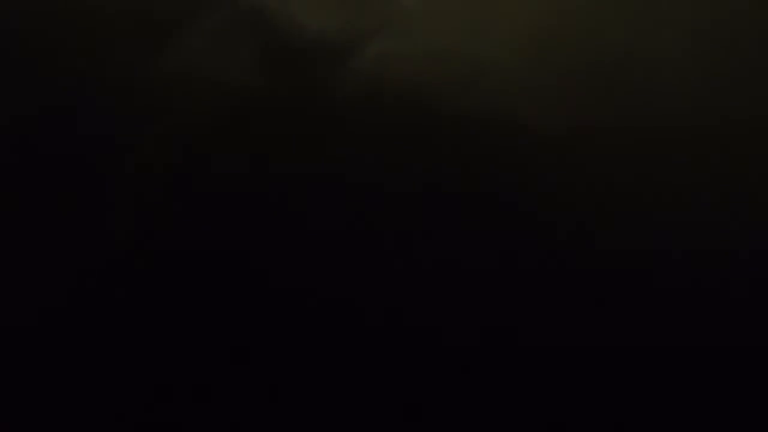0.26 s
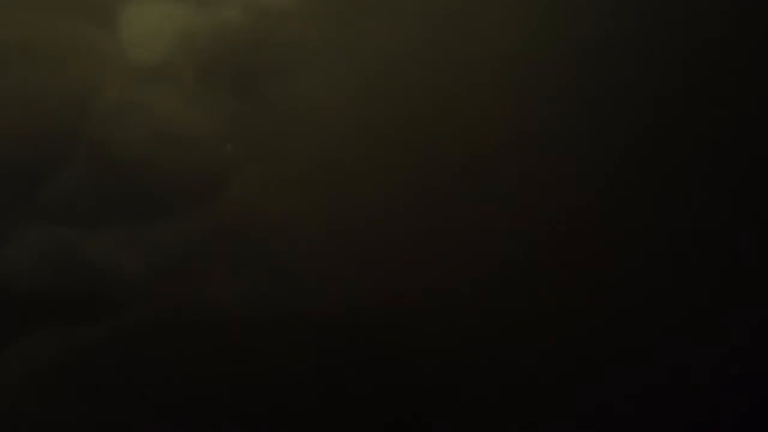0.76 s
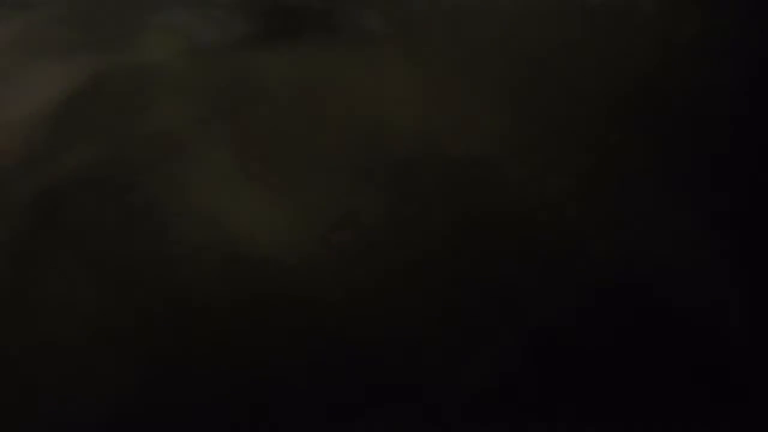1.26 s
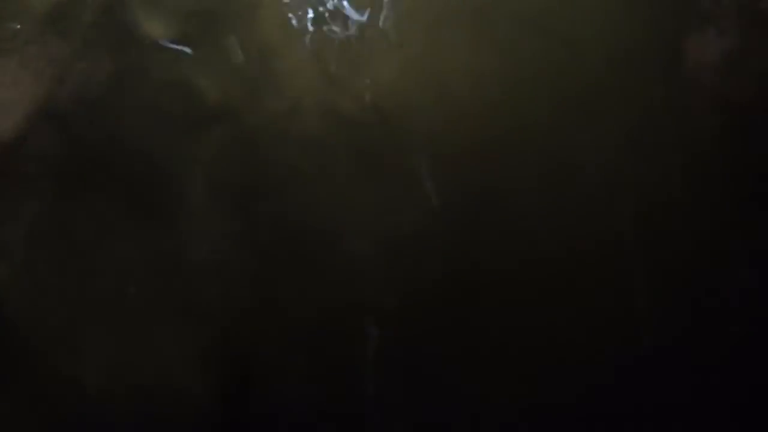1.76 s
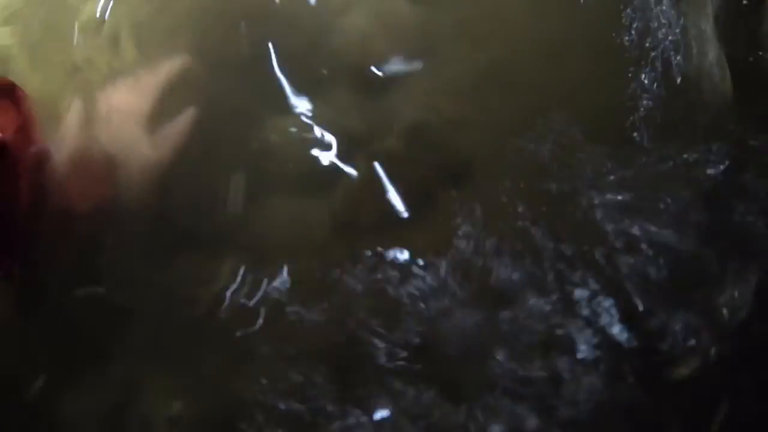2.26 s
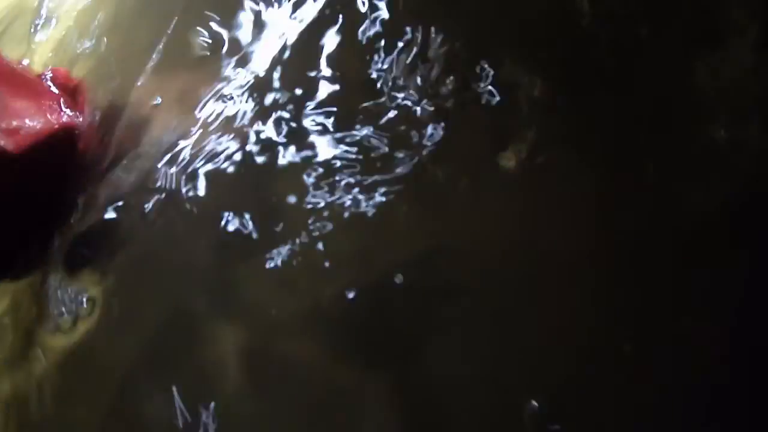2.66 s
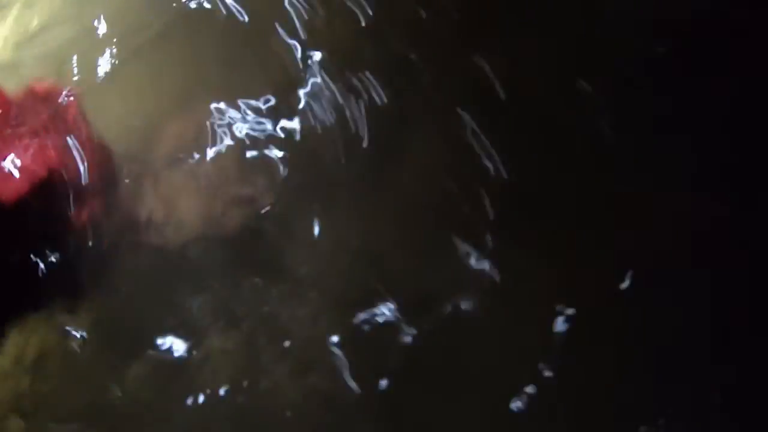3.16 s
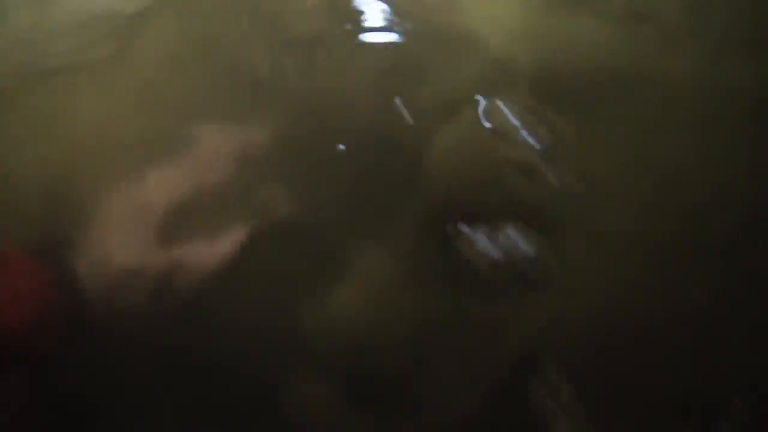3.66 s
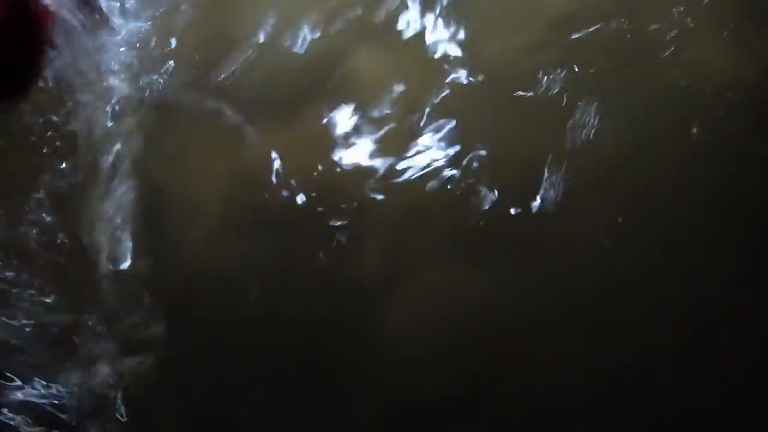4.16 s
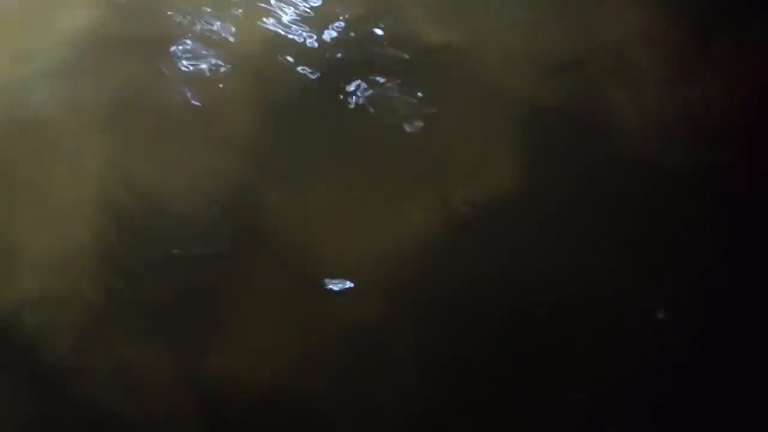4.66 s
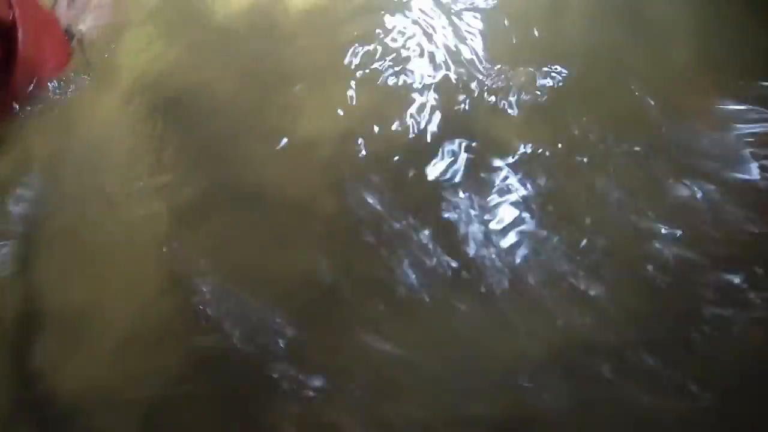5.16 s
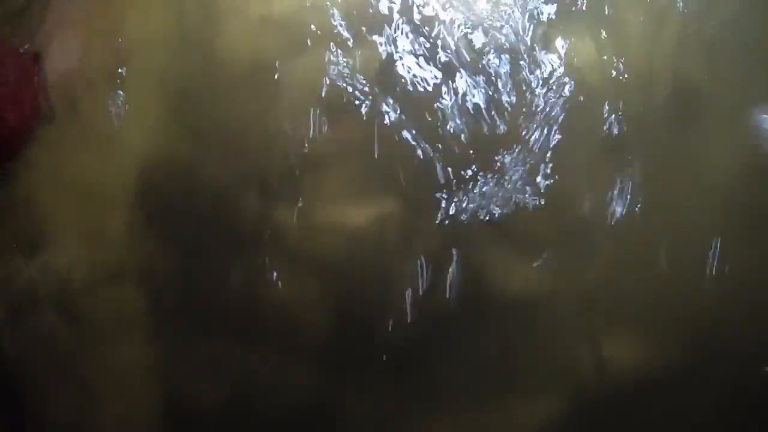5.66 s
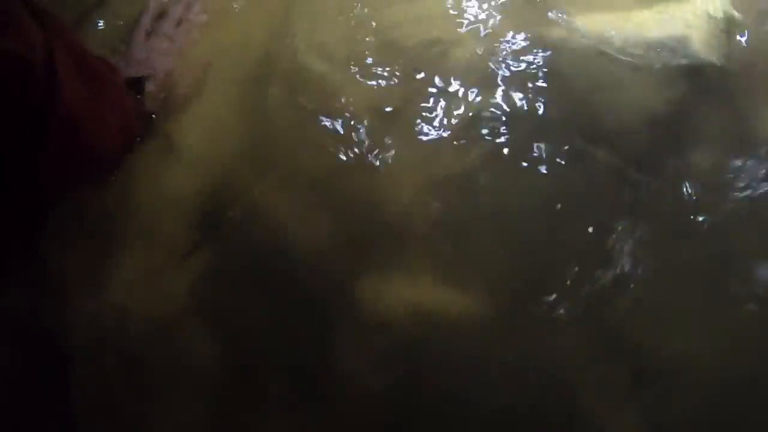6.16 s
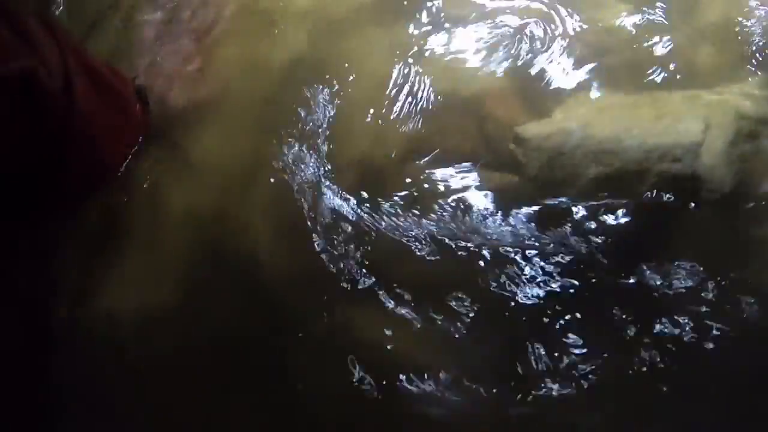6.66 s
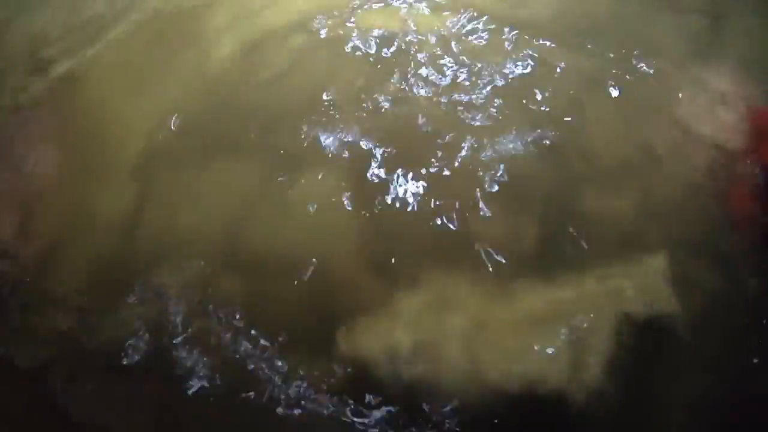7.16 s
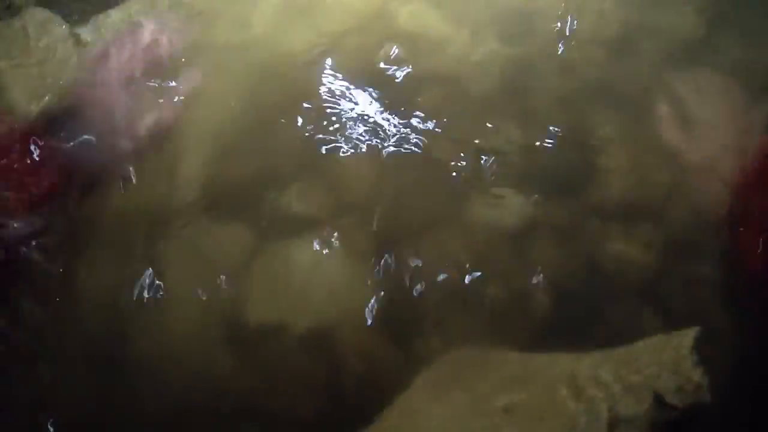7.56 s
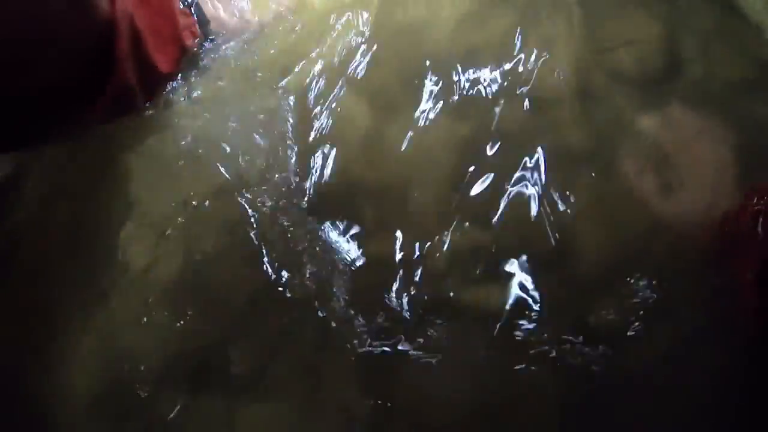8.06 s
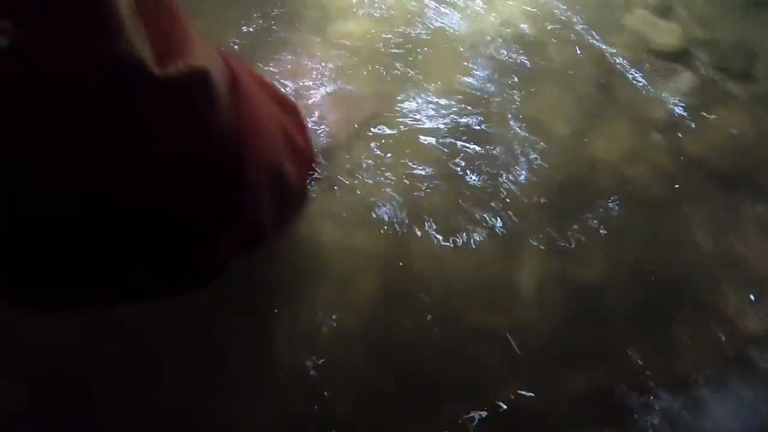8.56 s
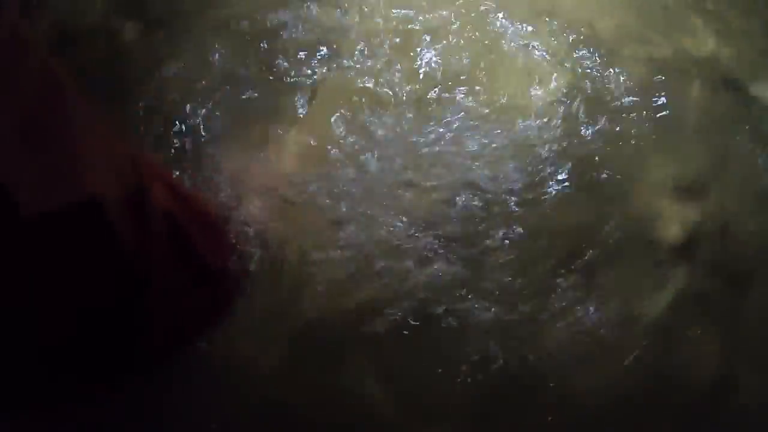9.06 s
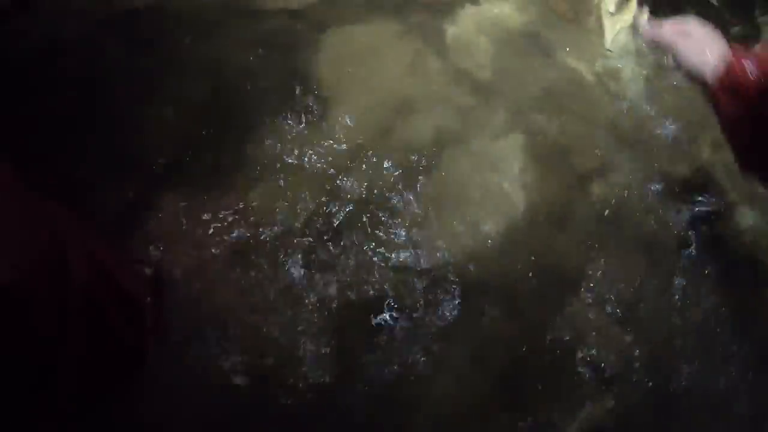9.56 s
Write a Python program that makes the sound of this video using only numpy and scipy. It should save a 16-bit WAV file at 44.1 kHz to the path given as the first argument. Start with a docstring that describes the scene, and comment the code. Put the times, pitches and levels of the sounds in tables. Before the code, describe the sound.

A loud, low underwater rumble cuts off, then shallow cave water sloshes and gurgles close by with soft, irregular wading splashes.

```python
"""A low rumble of water rolls off a sealed camera housing as it lifts out of a shallow cave stream.
Then the pool sloshes and gurgles close by as someone wades. Turbulence gives the noise, air bubbles
ring as damped oscillators, droplets tick on the shell, and near rock walls return a short echo.
The housing muffles all but the bass and one thin treble band."""
import sys
import numpy as np
from scipy import signal
from scipy.fft import rfft, irfft, next_fast_len
from scipy.io import wavfile
from scipy.ndimage import uniform_filter1d, minimum_filter1d, map_coordinates

SR = 44100
rng = np.random.default_rng(int(sys.argv[2]) if len(sys.argv) > 2 else 0)


def unload_wav(signal):
    """Save mono or channel-first audio to the path in sys.argv[1] as 16-bit WAV at rate SR, clipped to [-1, 1]."""
    wavfile.write(
        sys.argv[1],
        SR,
        np.round(np.clip(np.atleast_2d(signal).T, -1, 1) * 32767).astype(np.int16),
    )


N = 432621


def amp(db):
    return 10 ** (np.asarray(db) / 20)


def unit_rms(x):
    return x / np.sqrt(np.mean(x ** 2) + 1e-20)


def along(points, hz):
    """Interpolation of (frequency, value) points on a logarithmic frequency axis."""
    f, v = np.transpose(points)
    return np.interp(np.log(hz + 1), np.log(f + 1), v)


def curves(rows):
    """Linear interpolation in time: one value per sample for each column after the first."""
    times, *columns = np.transpose(rows)
    return [np.interp(np.arange(N) / SR, times, column) for column in columns]


def wobble(rate):
    """Random modulation: a spline through `rate` Gaussian values a second."""
    return map_coordinates(rng.standard_normal(N // 100), [np.arange(N) * rate / SR])


def filtered(x, response):
    """Zero-phase filtering: the spectrum is multiplied by a frequency response."""
    size = next_fast_len(N + 8192)
    return irfft(rfft(x, size) * response(np.fft.rfftfreq(size, 1 / SR)), size)[:N]


def coloured(x, spectrum):
    """Spectral shaping: x is whitened, given the spectrum and scaled to unit rms."""
    skirted = [(spectrum[0][0] / 4, -120), *spectrum, (spectrum[-1][0] * 3, -140)]
    own_colour = lambda hz: uniform_filter1d(np.abs(rfft(x, 2 * len(hz) - 2)), size=2001) + 1e-9
    return unit_rms(filtered(x, lambda hz: amp(along(skirted, hz)) / own_colour(hz)))


def noise(spectrum):
    return coloured(rng.standard_normal(N), spectrum)


def lay(start, shapes):
    """Superposition: each row of samples is added at its start time in seconds."""
    at = np.round(start * SR).astype(int)[:, None] + np.arange(shapes.shape[1])
    return np.bincount(at.clip(-1, N).ravel() + 1, shapes.ravel(), N + 2)[1:N + 1]


def humps(tops, db, rise, fall):
    """Upper envelope of triangular rises and falls in dB, zero between events."""
    lift, t = np.zeros(N), np.arange(N) / SR
    for top, height, up, down in np.broadcast(tops, db, rise, fall):
        lift = np.maximum(lift, np.interp(t, [top - up, top, top + down], [0, height, 0]))
    return lift


# Flow round the submerged shell. Each row: time in seconds, rumble in dB, gurgle in dB.
UNDERWATER = [(0, -21.5, -18.5), (.18, -19.5, -29), (.25, -18.5, -22), (.43, -24.5, -38), (.6, -30, -30),
              (.66, -30.5, -36.5), (.84, -27.5, -30.5), (.94, -32, -39), (1.09, -63, -43.5)]
# Slow waves that nudge the shell. Each row: crest time in seconds, lift in dB.
SLOW_WAVES = [(1.799, 12.5), (2.06, 6), (2.45, 10.5), (3.72, 5.5), (4.75, 5), (5.02, 10), (5.3, 7.5),
              (5.6, 11.5), (6.33, 5), (6.83, 1.5), (7.08, 9.5), (7.5, 10.5), (7.86, 7), (8.3, 4),
              (8.54, 13.5), (8.83, 14), (9, 7.5), (9.6, 8), (9.81, 7)]
# Deep pushes of water. Each row: crest time in seconds, gurgle and churn lifts in dB,
# rise and fall in seconds.
DEEP_PUSHES = [(1.94, 18.7, 2, 0.39, 0.59), (2.47, 14.5, 3.3, 0.94, 0.88), (3.7, 11, 2.1, 0.47, 0.16),
               (4.2, 19.5, 8.6, 0.25, 0.43), (5.01, 9.6, 2.1, 0.7, 0.88), (5.85, 9.2, 0.58, 0.1, 0.4),
               (7.1, 7.1, 2.9, 0.068, 0.59), (7.77, 12.7, 4.9, 0.58, 0.66), (8.56, 10.7, 8.1, 0.23, 0.52),
               (8.85, 17.6, 3.3, 0.31, 0.11), (9.79, 1.1, 6.7, 0.31, 0.09)]
# The pool between splashes. Each row: time in seconds, then slosh, spatter and fizz in dB.
CALM_POOL = [(0, -40.5, -79.5, -71), (.22, -67.5, -75.5, -77), (.33, -48.5, -78, -71),
             (.4, -57.5, -76.5, -72.5), (.5, -44, -69, -65.5), (.66, -51.5, -68, -77.5),
             (.72, -52, -76, -66.5), (.82, -47.5, -61.5, -73), (.9, -54.5, -79, -67.5),
             (.95, -45.5, -66, -71), (1.15, -49, -83, -77.5), (1.55, -40, -73, -77),
             (2.1, -40.5, -73.5, -75), (2.6, -39.5, -70.5, -71.5), (3.2, -41.5, -71.5, -78),
             (3.8, -41, -70, -76.5), (4.8, -42.5, -75, -77), (5.5, -44, -73, -75.5),
             (6.3, -41.5, -72, -81.5), (6.75, -45.5, -69, -83), (7.15, -45, -67.5, -77),
             (8.4, -41.5, -65, -73), (9.1, -41.5, -69.5, -74.5), (9.81, -44.5, -66.5, -71.5)]
# Splashes. Each row: crest time in seconds, lift in dB, rise and fall in seconds.
WADING_SPLASHES = [(1.921, 6, 0.078, 0.16), (4.28, 11, 0.31, 0.81), (5.01, 7, 0.31, 0.9),
                   (5.88, 11.5, 0.33, 0.19), (6.93, 3, 0.19, .08), (7.12, 4, 0.12, .1),
                   (7.72, 4.5, 0.12, 0.2), (8.2, 5.5, 0.17, 0.22), (8.8, 8, 0.43, 0.28)]
CALM_GURGLE_DB, CALM_CHURN_DB, CALM_HEAVE_DB = -48, -44, -40


def water_levels():
    """Amplitude envelopes in dB: waves, pushes and splashes lift six bands above calm water."""
    rumble_db, bubbling_db = curves(UNDERWATER)
    # the slow heave overtakes the rumble as the shell nears the surface
    nearing_db = -12 + 17 * np.arange(N).clip(0, SR) / SR
    wave_db = humps(*np.transpose(SLOW_WAVES), rise=0.33, fall=0.19)
    heave_db = np.maximum(rumble_db + nearing_db, CALM_HEAVE_DB + wave_db)
    tops, gurgle_lift, churn_lift, rise, fall = np.transpose(DEEP_PUSHES)
    churn_db = np.maximum(rumble_db, CALM_CHURN_DB + humps(tops, churn_lift, rise, fall))
    gurgle_db = np.maximum(bubbling_db, CALM_GURGLE_DB + humps(tops, gurgle_lift, rise, fall))
    slosh_db, spatter_db, fizz_db = curves(CALM_POOL)
    splash_db = humps(*np.transpose(WADING_SPLASHES))
    return (heave_db, churn_db, gurgle_db,
            slosh_db + splash_db, spatter_db + splash_db, fizz_db + 0.98 * splash_db)


def swarm(count, hz, octaves, cycles, spread_db, samples):
    """Bubble resonance: damped sines of random onset and size, each rising in pitch."""
    start = rng.random(count) * N / SR
    pitch = hz * 2 ** (octaves * rng.standard_normal((count, 1)))
    strength = amp(spread_db * rng.exponential(size=(count, 1)))
    turns = pitch * np.arange(samples) / SR
    age = turns / cycles
    envelope = strength * age * np.exp(-2.5 * age) * np.hanning(2 * samples)[samples:]
    return lay(start, envelope * np.sin(2 * np.pi * turns * (1 + 0.065 * age)))


def bubbly_flow(spectrum, grains, bubble_share, flutter_db):
    """Incoherent sources add in power: reverberant bubbles and turbulence share one spectrum."""
    turbulence = noise(spectrum)
    bubbling = coloured(grains + amp(-5.5) * cave_echo(grains), spectrum)
    flow = np.sqrt(bubble_share) * bubbling + np.sqrt(1 - bubble_share) * turbulence
    return unit_rms(amp(flutter_db) * flow)


# Spectra of the water, low to high. Each row: frequency in Hz, relative spectral density in dB.
HEAVE_SPECTRUM = [(7, -16.5), (15, 6.5), (30, -2.5), (45, -1), (65, -19), (120, -60.5)]
CHURN_SPECTRUM = [(35, -1.5), (65, 0), (130, -0.5), (220, -2.5), (300, -26.5), (450, -56)]
GURGLE_SPECTRUM = [(170, -56.5), (250, -2), (320, 0), (430, -3), (560, -23), (900, -64)]
SLOSH_SPECTRUM = [(300, -25.5), (450, -1.5), (670, -1.5), (830, -8.5), (1300, -21.5), (1900, -42),
                  (3000, -79.5)]
SPATTER_SPECTRUM = [(900, -35.5), (1400, -7), (2100, -14.5), (3000, -24.5), (4000, -40.5)]
FIZZ_SPECTRUM = [(2500, -19.5), (3400, -6.5), (4200, 3), (5000, 7.5), (5700, 2.5), (6500, -6),
                 (6900, -13.5), (10000, -47.5), (15000, -65)]
SPRAY_SPECTRUM = [(6300, -25), (7200, 5), (9500, 1), (11500, -7), (14000, -27)]


def stream():
    """Turbulent pressure heaves and churns on the shell; the smaller a bubble, the higher it rings."""
    heave_db, churn_db, gurgle_db, slosh_db, spatter_db, fizz_db = water_levels()
    lap = wobble(14)  # each lap of water shakes several bubble sizes loose at once
    heave = unit_rms(amp(0.51 * wobble(6.7)) * noise(HEAVE_SPECTRUM))
    churn = unit_rms(amp(2.5 * wobble(22) + 0.17 * lap) * noise(CHURN_SPECTRUM))
    big = swarm(count=900, hz=339, octaves=0.35, cycles=8.6, spread_db=2, samples=2400)
    middle = swarm(count=1500, hz=721.4, octaves=0.506, cycles=8.3, spread_db=2, samples=1400)
    small = swarm(count=2500, hz=1900, octaves=0.4, cycles=8, spread_db=2.2, samples=400)
    tiny = swarm(count=9000, hz=5410, octaves=0.3, cycles=18, spread_db=1, samples=240)
    gurgle = bubbly_flow(GURGLE_SPECTRUM, big, bubble_share=0.73, flutter_db=1.3 * lap)
    slosh = bubbly_flow(SLOSH_SPECTRUM, middle, bubble_share=0.7, flutter_db=lap)
    spatter = bubbly_flow(SPATTER_SPECTRUM, small, bubble_share=0.6, flutter_db=2.2 * lap)
    fizz = bubbly_flow(FIZZ_SPECTRUM, tiny, bubble_share=0.5, flutter_db=0.79 * lap + 1.6 * wobble(40))
    # only strong splashes throw fine spray: it grows faster than the fizz and comes in puffs
    spray_db = -101 + 1.56 * (fizz_db + 78) + 1.5 * wobble(10) + 3.6 * wobble(170)
    spray = amp(spray_db) * noise(SPRAY_SPECTRUM)
    low = amp(heave_db) * heave + amp(churn_db) * churn + amp(gurgle_db) * gurgle
    return low + amp(slosh_db) * slosh + amp(spatter_db) * spatter + amp(fizz_db) * fizz + spray


# Decay in the cave. Each row: frequency in Hz, time to fall 60 dB in seconds.
CAVE_DECAY = [(200, 0.34), (800, 0.45), (4000, 0.049)]


def cave_echo(x):
    """Reverberation: reflections from near rock decay exponentially, each frequency at its own rate."""
    hz, t, spectra = signal.stft(rng.standard_normal(SR // 3), SR, nperseg=512)
    decay = amp(-60 * t / along(CAVE_DECAY, hz)[:, None])
    _, tail = signal.istft(spectra * decay, SR, nperseg=512)
    delayed = np.pad(x, (400, 0))
    return signal.fftconvolve(delayed, tail / np.linalg.norm(tail))[:N]


# Single air pockets. Each row: onset in seconds, pitch in Hz, level in dB, fade in milliseconds.
AIR_POCKETS = [(0.012, 239, -10.5, 27), (.04, 334, -12, 5.3), (.106, 96.4, -5.5, 5.6),
               (0.196, 129.4, -8, 6.8), (0.233, 122, -15.5, 5.6), (0.248, 237, -9, 4.8),
               (0.29, 155, -11.5, 7.5), (.439, 2770, -56, 3.7), (.49, 128, -9.5, 6.1), (0.49, 308, -13, 14),
               (0.498, 465, -14, 1.8), (0.534, 503, -22, 3.8), (.565, 80, -7, 14), (.624, 340, -12.5, 3.1),
               (.69, 35.7, -11.5, 31), (0.715, 1110, -44.5, 13), (0.795, 30.4, -11.5, 18),
               (0.905, 80.1, -7, 1.7), (0.935, 96, -9, 4.5), (1.028, 838, -37, 15), (1.334, 466, -27, 10.6),
               (1.429, 550, -23, 16), (1.883, 473, -16, 18), (1.912, 820, -27.5, 5.2),
               (1.913, 312.4, -12, 53), (2.119, 464, -16, 15), (2.135, 303, -19, 25),
               (2.192, 316, -21.5, 13), (2.216, 432, -18, 6.4), (2.258, 523, -32.5, 5),
               (2.344, 485, -9.5, 2.1), (2.752, 560, -23, 5), (2.784, 303, -26, 8),
               (2.886, 764, -26.5, 1.4), (3.304, 1900, -47, 2.3), (3.31, 1020, -32.5, 11),
               (3.36, 637, -28, 24), (3.906, 672, -23.5, 9.8), (3.938, 375, -14.5, 1.2),
               (4.049, 272, -25, 15), (4.062, 538, -22, 5.8), (4.091, 1035, -33.5, 2.6),
               (4.109, 192, -24.5, 13), (4.053, 1480, -46, 4.4), (4.121, 1860, -47, 6),
               (4.207, 484, -18, 29), (4.259, 313, -16, 31), (4.282, 880, -17.5, 3.4),
               (4.303, 1170, -29.5, 2.5), (4.33, 690, -16.5, 2.3), (4.365, 486, -16, 5.3),
               (4.403, 634, -20, 16), (4.523, 726, -14.5, 4.2), (4.683, 655, -24.5, 2.3),
               (4.962, 640, -25, 6.6), (4.994, 543, -26, 16), (5.097, 747, -26.5, 6),
               (5.16, 2050, -47, 2.7), (5.177, 1140, -36.5, 8.3), (5.262, 700, -28.5, 10),
               (5.625, 847, -25.5, 2), (5.708, 309, -23.5, 26), (5.707, 833, -28, 5.7),
               (5.743, 678, -27, 33), (5.775, 1444, -31.5, 5.4), (5.785, 920, -22, 1.1),
               (5.815, 320, -20, 6.9), (5.816, 706, -14, 3.5), (5.853, 424, -23, 3.2), (5.88, 670, -31, 5),
               (6.062, 432, -20.5, 5.8), (6.07, 704, -17, 1.7), (6.36, 1080, -33, 5.3),
               (6.807, 553, -32, 8.7), (6.926, 1150, -33.5, 4.5), (7.103, 668, -23, 0.61),
               (7.525, 306, -26.5, 19), (7.666, 322, -14.5, 39), (7.678, 2890, -54.5, 5),
               (7.665, 990, -32, 2.9), (7.69, 322, -26, 8), (7.719, 317, -27.5, 21),
               (7.766, 334, -19.5, 24), (7.789, 342, -19.5, 15), (7.813, 359.4, -18, 28),
               (7.84, 627, -16, 0.81), (8.022, 827, -29, 9.5), (8.107, 1200, -32, 5.8),
               (8.188, 1330, -35, 5.4), (8.201, 620, -29.5, 5), (8.226, 960, -30, 4),
               (8.543, 187, -18, 4.3), (8.578, 226, -12, 1.8), (8.615, 743, -23, 3.3), (8.655, 200, -18, 2),
               (8.659, 810, -23.5, 1.7), (8.741, 634, -23, 2.8), (8.763, 1460, -39.5, 8),
               (8.789, 480, -31, 7), (8.813, 803, -19.5, 2.8), (8.832, 655, -26.5, 7.8),
               (8.843, 1023, -32, 8.6), (9.056, 774, -28.5, 3), (9.307, 753, -25, 4.7)]


def bubbles():
    """Air is the spring and water the mass: each bubble swells, rings and fades; small ones climb."""
    onset, hz, db, fade_ms = np.transpose(AIR_POCKETS)[:, :, None]
    swell_ms = 5.98 * (400 / hz) ** 0.695
    lead_s = 0.05
    t = np.arange(SR // 3) / SR - lead_s - swell_ms / 1000  # zero at the peak
    from_peak = 1000 * t / np.where(t < 0, swell_ms, fade_ms).clip(2.2)
    envelope = amp(db - 15.2 * np.sqrt(from_peak ** 2 + 0.0056))  # straight dB slopes, rounded top
    climb = 1 + 1.6 * t * (hz.clip(0, 1400) / 800) ** 2  # pitch rises towards the surface
    phase = 2 * np.pi * (hz * t * climb + rng.random((len(onset), 1)))
    return lay(onset[:, 0] - lead_s, envelope * np.sin(phase))


# Dry snaps on the shell. Each row: centre time in seconds, level in dB, pitch in Hz.
SHELL_SNAPS = [(.114, -55, 3000), (.2365, -61, 2900), (.422, -58, 2000), (.474, -61, 2300),
               (.5105, -33, 4600), (.7345, -56, 6000), (.92, -58, 2700), (3.5348, -57, 5200),
               (5.7069, -58, 2200), (6.432, -51, 2300), (6.432, -55, 5100), (7.3108, -39, 4800),
               (7.3112, -50, 2400), (9.17, -55, 2200), (9.641, -56, 4800)]


def snaps():
    """A short pulse has a wide spectrum: a millisecond of tone in a Gaussian envelope is a click."""
    centre, db, hz = np.transpose(SHELL_SNAPS)[:, :, None]
    t = np.arange(-100, 100) / SR
    envelope = amp(db) * np.exp(-(t / 0.0003) ** 2)
    return lay(centre[:, 0] + t[0], envelope * np.sin(2 * np.pi * hz * t))


# Droplets and knocks on the shell. Each row: start in seconds, ring level in dB, pitch in Hz,
# relative weight of the thud in dB.
SHELL_IMPACTS = [(.226, -72, 4000, 24.5), (0.3155, -58.5, 5230, 1), (0.33, -61.5, 4100, 14),
                 (0.3599, -57, 5530, -10.5), (0.4209, -54.5, 4460, 6), (0.456, -58.5, 5700, 0.5),
                 (0.4896, -44.5, 3900, 3.5), (0.4966, -31.5, 3950, -6), (0.4971, -34, 5400, -35),
                 (0.5342, -65, 3830, 16.5), (0.7603, -60, 4050, -14.5), (0.9979, -52.5, 4500, -10),
                 (1.8127, -57, 4480, 4), (1.9234, -61.5, 3860, 18), (2.0317, -56.5, 4430, 8),
                 (2.119, -57, 4900, 2.5), (2.2922, -51.5, 5100, 10.5), (2.3426, -60.5, 4370, 21),
                 (2.9926, -60.5, 5000, 10), (3.2994, -65, 5470, 18.5), (3.9053, -65.5, 4120, 29.5),
                 (3.9402, -55, 4140, 0), (4.3085, -54.5, 5600, 26), (5.0898, -52, 4620, 7.5),
                 (5.595, -55.5, 4800, 8), (5.8152, -48.5, 5380, 4.5), (5.8394, -55, 4860, 20.5),
                 (5.9119, -54.5, 5220, 7.5), (7.024, -57, 4740, 3.5), (7.049, -60.5, 4860, -3),
                 (7.153, -58, 4600, 12), (7.267, -61, 4570, -3.5), (7.6103, -54.5, 5200, 7.5),
                 (8.0163, -61.5, 4330, 24.5), (8.5505, -51.5, 4950, 4.5), (8.771, -47, 4940, 4),
                 (8.8554, -47.5, 4700, 7), (8.866, -47, 5700, 9), (8.972, -54.5, 5020, 8.5),
                 (9.1684, -49, 4740, -0.5), (9.2658, -54.5, 5000, 10)]
# The shell's bright and dull responses. Each row: frequency in Hz, gain in dB.
CRACK_RESPONSE = [(1800, -11), (2500, -11), (3400, -10.5), (5000, 9), (6400, -3.5), (7000, -24.5)]
THUD_RESPONSE = [(150, -10.5), (500, 3), (1200, -4.5), (2200, -40), (3200, -43.5)]


def ticks():
    """Impact excitation: a contact rings the microphone port briefly, with a crack and a dull thud."""
    start, db, hz, thud_db = np.transpose(SHELL_IMPACTS)[:, :, None]
    t = np.arange(900) / SR
    contact = rng.standard_normal((len(start), len(t))) * (1 - np.exp(-t / 0.000092))
    tone = np.sin(2 * np.pi * hz * t) * (1 - np.exp(-t / 0.00019))

    def damped(x, level_db, t60):
        return lay(start[:, 0], amp(level_db - 60 * t / t60) * x)

    ring = damped(tone, db, t60=0.017)
    crack = filtered(damped(contact, db - 4, t60=0.041),
                     lambda f: amp(along(CRACK_RESPONSE, f)) * (f > 1500) * (f < 7500))
    thud = filtered(damped(contact, db + thud_db + 21.5, t60=0.029),
                    lambda f: amp(along(THUD_RESPONSE, f)) * (f < 3500))
    return ring + crack + thud


# Fine spray hitting the shell. Each row: start in seconds, level before filtering in dB,
# time to fall 60 dB in seconds.
SPRAY_PUFFS = [(0.319, -66, 0.17), (0.362, -66, 0.056), (.455, -61, 0.028), (0.4968, -54.5, 0.017),
               (0.733, -66, 0.026), (.92, -70.5, 0.087), (1.923, -72, 0.092), (5.815, -68, 0.1),
               (8.5513, -62.5, 0.049), (8.855, -57.5, 0.12), (9.167, -65, .07)]


def puffs():
    """Many tiny impacts merge into noise: bursts of high hiss with exponential decay."""
    start, db, t60 = np.transpose(SPRAY_PUFFS)[:, :, None]
    t = np.arange(SR // 10) / SR
    envelope = amp(db - 60 * t / t60)
    bursts = lay(start[:, 0], envelope * rng.standard_normal(envelope.shape))
    return filtered(bursts, lambda f: amp(along(SPRAY_SPECTRUM, f)) * (f > 6000))


# The microphone port rings higher as it drains. Each row: time in seconds, pitch in Hz, level in dB.
PORT_RESONANCE = [(.44, 3900, -105), (.47, 3900, -77), (.6, 3960, -77), (.82, 3900, -74), (.95, 3920, -76),
                  (1.15, 4180, -77), (1.26, 4180, -78), (1.3, 4280, -87), (1.42, 4540, -81),
                  (1.5, 4450, -105)]


def draining_port():
    """Randomly driven resonance: trickling water excites a narrow, raspy band of noise in the port."""
    hz, db = curves(PORT_RESONANCE)
    phase = 2 * np.pi * np.cumsum(hz) / SR
    trickle = amp(4 * wobble(30))
    narrow_band = wobble(200) * np.sin(phase) + wobble(210) * np.cos(phase)
    return amp(db) * unit_rms(trickle * narrow_band)


# Faint buzzing clicks of recorder distortion on loud peaks. Each row: start and end in seconds,
# clicks per second, base level in dB.
PEAK_CRACKLE = [(.561, .633, 188, -46), (2.339, 2.357, 480, -57)]


def peak_crackle():
    """A periodic impulse train buzzes: thin, even clicks, strongest about a third of the way in."""
    clicks = np.zeros(N)
    for start, end, rate, db in PEAK_CRACKLE:
        times = np.arange(start, end, 1 / rate)[:, None]
        swell_db = np.interp(times, np.linspace(start, end, 4), [-12, 5, -10, 2.5])
        clicks += lay(times[:, 0], amp(db + swell_db + 1.5 * rng.standard_normal(times.shape)))
    treble = [(2500, 8), (8000, 2.5), (15000, -4)]  # Hz, dB
    return filtered(clicks, lambda hz: (hz > 2500) * amp(along(treble, hz)))


# Bubbles that whistle upwards. Each row: start in seconds, first and last pitch in Hz,
# length in seconds, level in dB.
RISING_WHISTLES = [(1.037, 1070, 2070, 0.016, -53.5), (3.055, 830, 1000, 0.033, -40.5),
                   (3.901, 741, 1484, 0.018, -44), (9.127, 549, 1034, 0.036, -35.5)]


def surfacing_bubbles():
    """Mass loading falls near the surface, so a bubble's pitch climbs ever faster."""
    start, low_hz, high_hz, length, db = np.transpose(RISING_WHISTLES)[:, :, None]
    progress = (np.arange(SR // 12) / SR / length).clip(0, 1)
    hz = low_hz + (high_hz - low_hz) * progress ** 1.8
    phase = 2 * np.pi * np.cumsum(hz, axis=1) / SR
    envelope = amp(db) * np.sqrt(np.abs(np.sin(np.pi * progress))) * (progress < 1)
    return lay(start[:, 0], envelope * np.sin(phase))


def scene():
    """Direct and reflected sound add: bubbles echo over the stream, contacts on the shell stay drier."""
    bubbling = bubbles() + surfacing_bubbles()
    contacts = ticks() + snaps()
    surfacing_s = 0.99  # the walls are hardly heard until the shell is out
    walls_db, = curves([(surfacing_s - 0.1, -14.5), (surfacing_s, 0)])
    echo = cave_echo(amp(walls_db) * (amp(-8.5) * bubbling + amp(-11) * contacts))
    mix = bubbling + contacts + echo + puffs() + stream() + draining_port() + peak_crackle()
    fade_in = np.sin(np.pi / 2 * (np.arange(N) / (0.004 * SR)).clip(0, 1)) ** 2
    return (fade_in * mix)[None]


def record(dry):
    """Look-ahead limiting holds the loudest surges; faint preamp hiss and a band limit follow."""
    ceiling, hiss_db, top_hz = 0.43, -104, 15800
    needed_gain = np.minimum(1, ceiling / (np.abs(dry[0]) + 1e-9))
    held_gain = minimum_filter1d(needed_gain, size=1601)
    gain = uniform_filter1d(uniform_filter1d(held_gain, size=801), size=801)
    x = gain * dry[0] + amp(hiss_db) * rng.standard_normal(N)
    return filtered(x, lambda hz: hz < top_hz)[None]


dry = scene()
out = record(dry)
unload_wav(out)
```